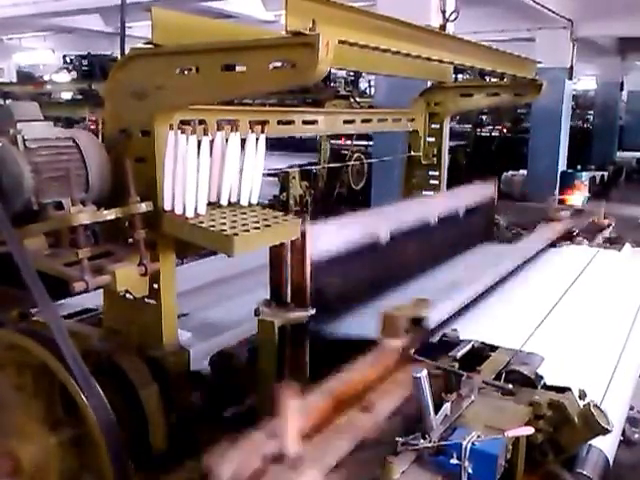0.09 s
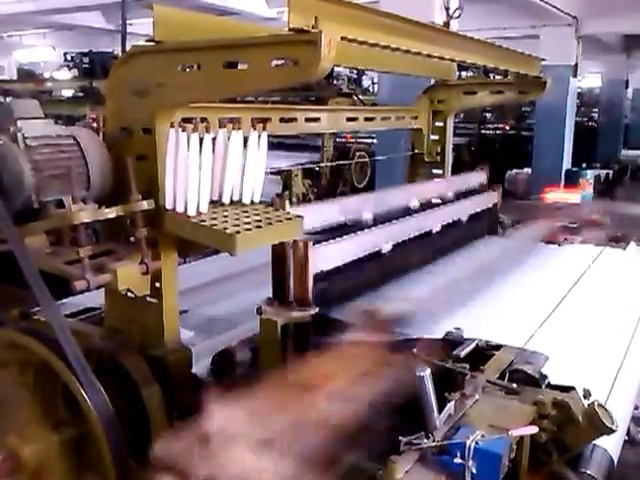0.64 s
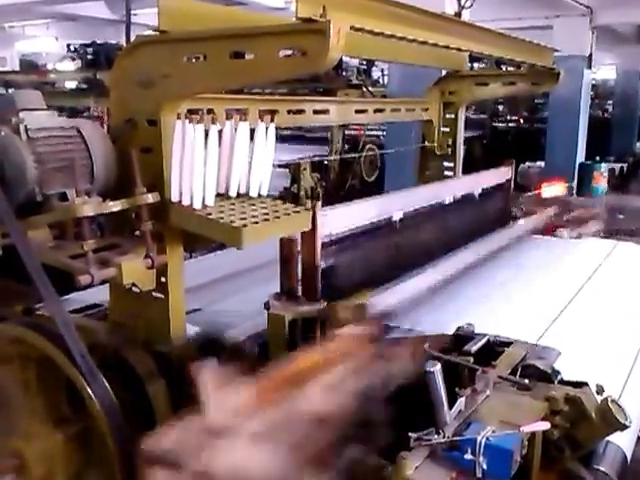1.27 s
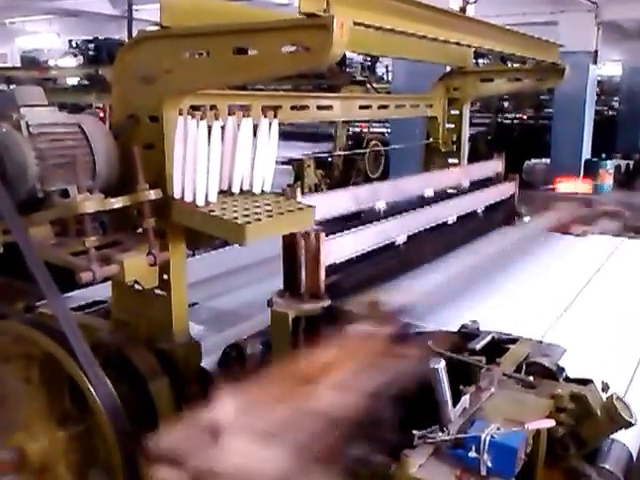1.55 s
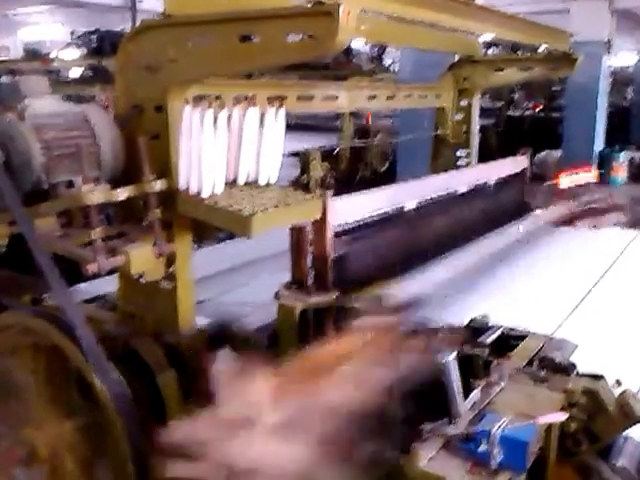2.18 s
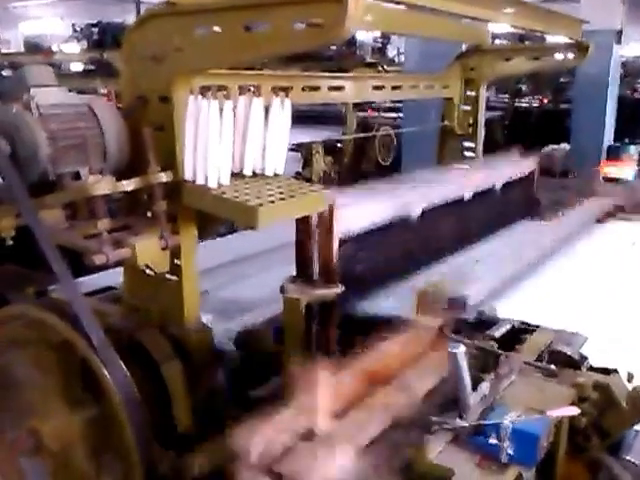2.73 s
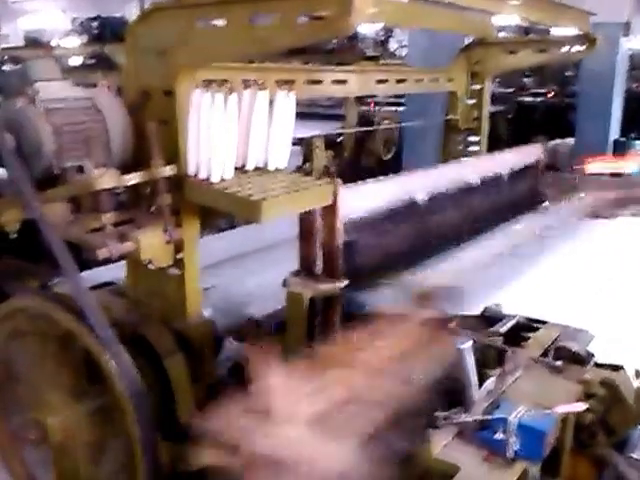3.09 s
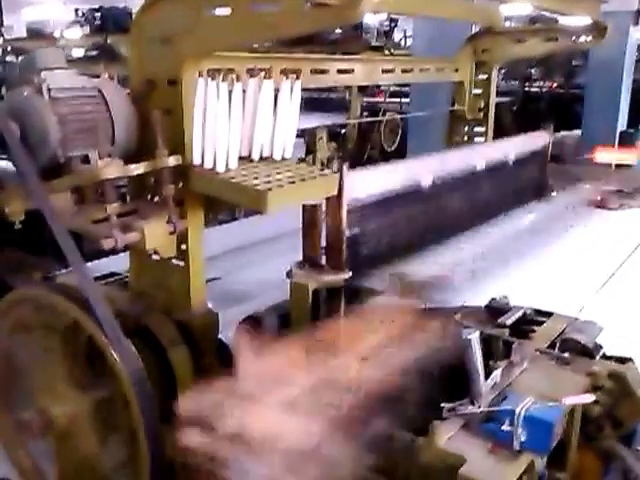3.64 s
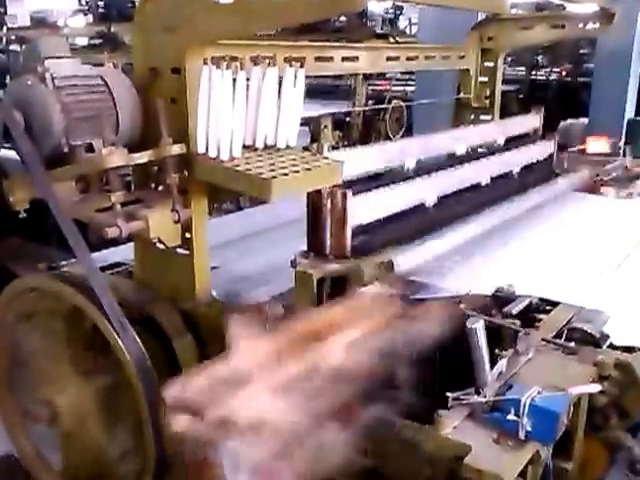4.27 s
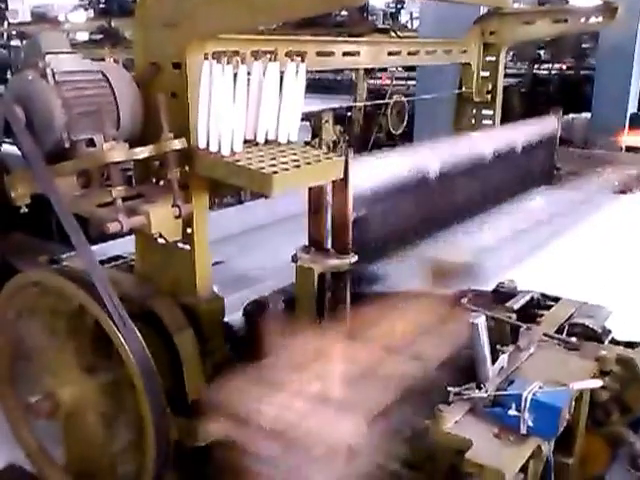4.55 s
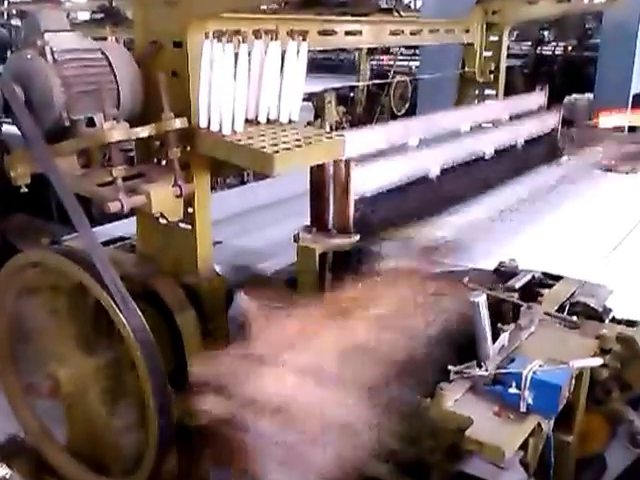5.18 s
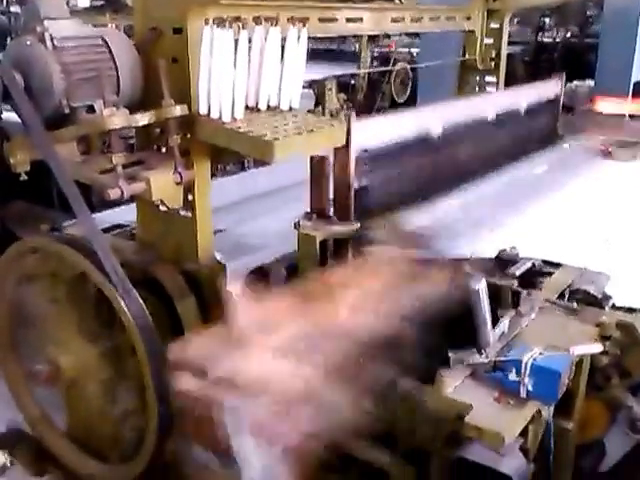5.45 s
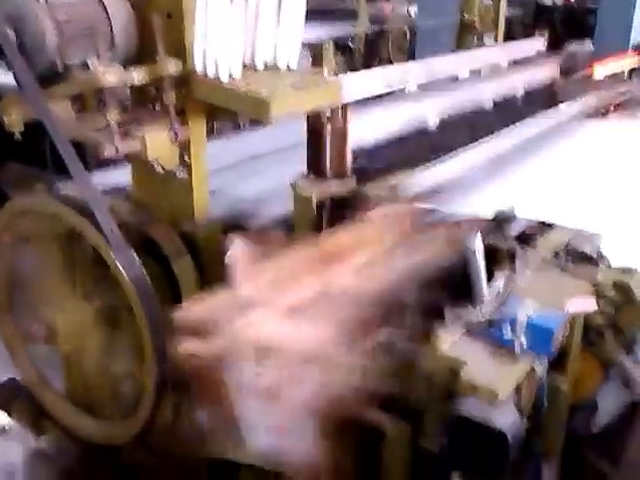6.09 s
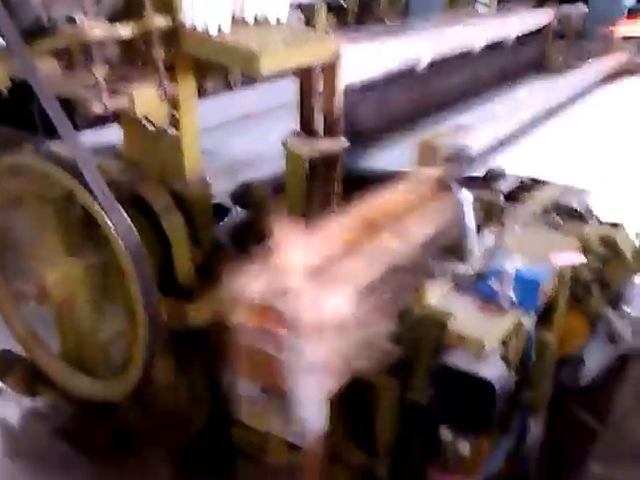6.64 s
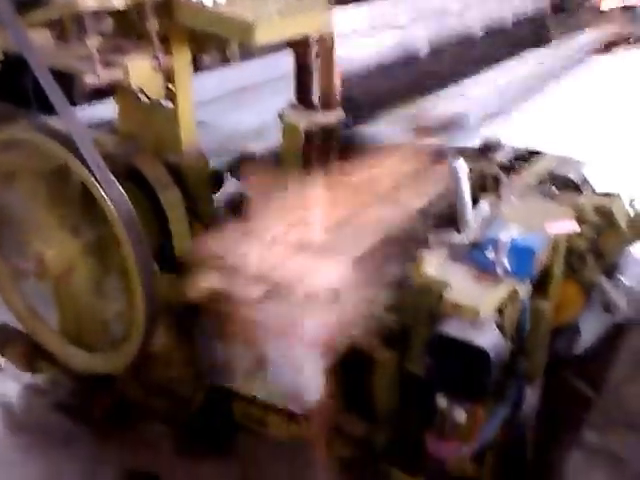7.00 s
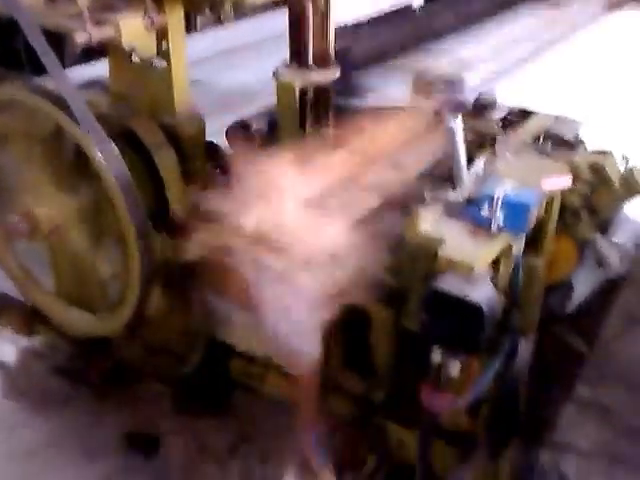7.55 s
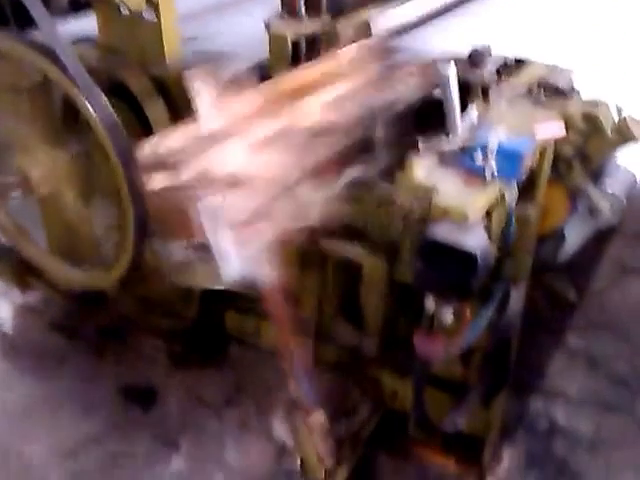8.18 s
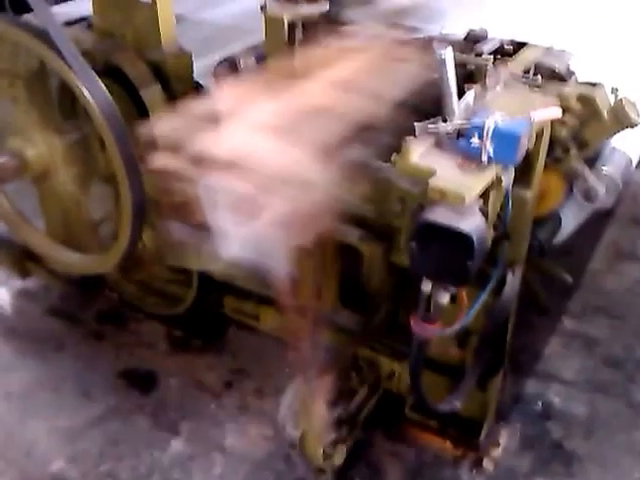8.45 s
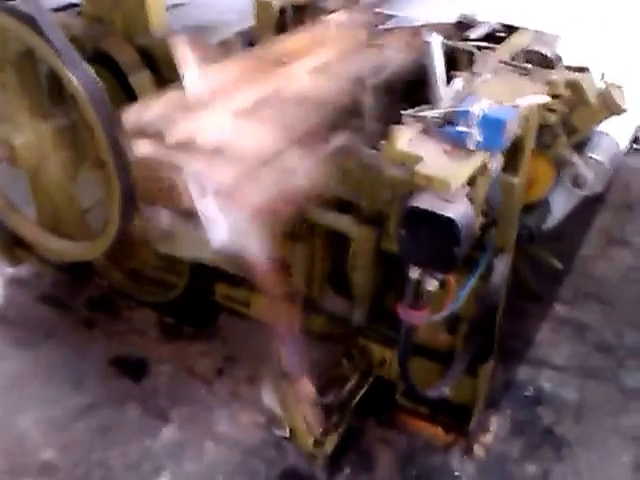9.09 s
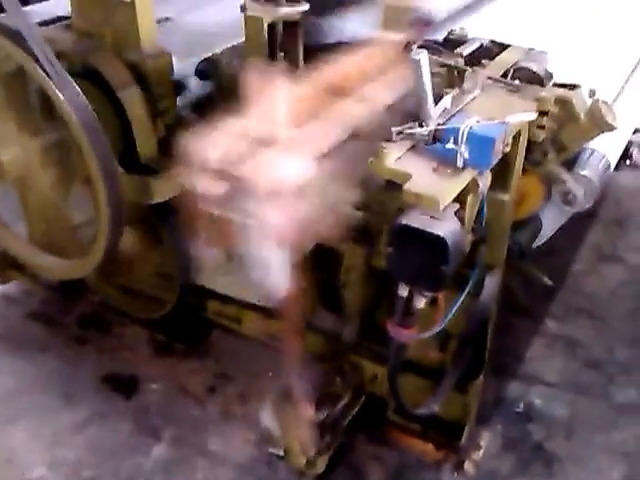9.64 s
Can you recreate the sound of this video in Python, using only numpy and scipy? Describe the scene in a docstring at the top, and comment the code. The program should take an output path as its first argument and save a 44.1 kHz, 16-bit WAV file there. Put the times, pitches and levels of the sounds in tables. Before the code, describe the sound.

Mechanical looms clack hard and fast close by, over constant metal rattling and the roar of a large weaving mill.

```python
"""Hard wooden clacks from three shuttle looms weaving close by in a large mill. Each loom turns in
about 0.87 s (a pick out and a pick back) at its own pace, so their beats drift past each other.
On every turn a shuttle slams into its box or a picking stick cracks against its buffer, and sley
and harness knock and rattle. A steel pawl ticks, iron frames ring, and rows of far looms merge
into a roar. The top end is narrow and the hardest blows clip."""
import sys
import numpy as np
from scipy import signal
from scipy.fft import rfft, irfft
from scipy.io import wavfile

SR = 44100
rng = np.random.default_rng(int(sys.argv[2]) if len(sys.argv) > 2 else 0)


def waveform_to_disk(signal):
    """Save audio, clipped to [-1, 1], as 16-bit WAV at the path in sys.argv[1]."""
    frames = np.transpose(np.atleast_2d(signal))
    scaled = np.clip(frames, -1, 1) * 32767
    samples = np.round(scaled).astype(np.int16)
    wavfile.write(sys.argv[1], SR, samples)


N = 433062
TIME = np.arange(N) / SR


def undb(db):
    """Decibels to gain."""
    return 10 ** (np.asarray(db) / 20)


def unit(x):
    """Scale to rms 1."""
    return x / np.sqrt(np.mean(x ** 2))


def add(out, x, start_s):
    """Mix x into out from start_s on."""
    i = max(int(start_s * SR), 0)
    out[i:i + len(x)] += x[:max(len(out) - i, 0)]


def resonance(x, hz, q):
    """Band-pass with gain 1 at hz."""
    return signal.lfilter(*signal.iirpeak(hz, q, fs=SR), x)


def low_pass(x, hz):
    """Steep low-pass without delay."""
    return signal.fftconvolve(x, signal.firwin(161, hz, fs=SR)[None], mode="same")


def colour(x, eq, bright_db=0, size=4096):
    """Unit-power EQ through (frequency [Hz], level [dB]) points; brightness tilts it about 2.6 kHz."""
    hz, db = np.transpose(eq)
    log_hz = np.log(np.maximum(np.arange(size // 2 + 1) * SR / size, 1))
    tilt_db = bright_db / 2 * np.tanh(2 * (log_hz - np.log(2600)))
    rolloff_db = 200 * np.maximum(log_hz - np.log(hz[-1]), 0)
    curve_db = np.interp(log_hz, np.log(hz), db) + tilt_db - rolloff_db
    # minimum phase: nothing rings ahead of an attack
    cepstrum = irfft(np.log(undb(np.maximum(curve_db, -70))))
    cepstrum[1:size // 2] *= 2
    cepstrum[size // 2 + 1:] = 0
    response = irfft(np.exp(rfft(cepstrum)))
    return signal.fftconvolve(x, response / np.linalg.norm(response))[:len(x)]


def contacts(samples, per_s, spread_db):
    """Random tiny impacts of unequal size, mean power 1."""
    hit = rng.random(samples) < per_s / SR
    size = undb(spread_db * np.clip(rng.standard_normal(samples), -2, 2))
    sign = rng.choice([-1, 1], samples)
    return unit(hit * size * sign + 1e-9)


def mill_reverb(x, wet_db, t60, damp_hz):
    """Add the diffuse echo of floor, pillars and machines, duller than the direct sound."""
    t = np.arange(SR) / SR
    tail = rng.standard_normal(SR) * np.exp(-np.log(1000) * t / t60) * (1 - np.exp(-t / 0.0022))
    tail = signal.sosfilt(signal.butter(1, damp_hz, fs=SR, output="sos"), tail)
    return x + undb(wet_db) * signal.fftconvolve(x, tail / np.linalg.norm(tail))[:N]


# pace of the fast, middle and slow loom: (loom, one turn [s])
LOOM_TURN_S = {"fast": .8555, "middle": .8745, "slow": .8906}
# EQ of the distant roar: (frequency [Hz], level [dB])
ROAR_EQ = [(20, -4.5), (45, -3), (75, 0.5), (150, 2), (260, -1.5), (420, 0.5), (700, 0), (1000, 1),
           (1400, -1), (1900, 2.5), (2500, -3), (3500, -1.5), (5000, -11.5), (7500, -10.5)]


def far_looms(level_db, beat_db, smear_s, count=14):
    """The bed: rows of looms, each at its own speed, their beats smeared into a roar by the hall."""
    power = np.ones(N)
    for pace, phase, weight in rng.random((count, 3)):
        pick_s = LOOM_TURN_S["middle"] / 2 * (.93 + .14 * pace)
        since = (TIME + phase * pick_s) % pick_s
        power += undb(beat_db) * weight * np.exp(-since / smear_s)
    roar = colour(np.sqrt(power) * rng.standard_normal(N), ROAR_EQ)
    return undb(level_db) * unit(roar)


# ring of the iron loom frames: (frequency [Hz], relative level [dB])
IRON_MODES = [(1190, -1.5), (1330, -3.5), (1460, 1), (1610, -5.5), (1830, -3), (1940, 2), (2200, 2),
              (2900, -6)]


def iron_frames(level_db, t60):
    """Stray taps set the frames ringing briefly, now in one mode, now in another."""
    rings = np.zeros(N)
    for hz, db in IRON_MODES:
        taps = contacts(N, per_s=9, spread_db=6.5)
        rings += undb(db) * resonance(taps, hz, q=hz * t60 * np.pi / np.log(1000))
    return undb(level_db) * unit(rings)


# strokes that shake the harness every turn: (loom, first peak [s], level [dB], rise [s], fall [s])
HARNESS_STROKES = [("fast", 0.35, -26.5, 0.02, 0.017), ("fast", 0.411, -24, 0.014, 0.05),
                   ("fast", 0.707, -26, .03, .025), ("middle", 0.037, -25.5, 0.05, .03),
                   ("middle", 0.1, -24, 0.023, 0.097), ("middle", .40, -26.5, 0.018, 0.027),
                   ("middle", 0.491, -26, 0.011, .025), ("middle", 0.704, -26.5, 0.076, 0.096),
                   ("slow", 0.038, -27.5, .035, 0.096), ("slow", 0.302, -25, .05, .035),
                   ("slow", 0.513, -27, 0.09, .03), ("slow", 0.74, -22.5, 0.022, 0.024)]
# EQ of the rattling linkages: (frequency [Hz], level [dB])
HARNESS_EQ = [(200, -19.5), (600, -11), (1000, -3.5), (1300, 2), (1800, 0.5), (2500, 0), (3300, -1),
              (4500, -4.5), (5100, -4), (6000, -6), (6700, -8), (8000, -9)]


def harness(steady_db):
    """Wire healds and linkages: a swarm of small contacts that swells with each stroke and falls back."""
    power = np.full(N, undb(steady_db) ** 2)
    for loom, peak_s, db, rise_s, fall_s in HARNESS_STROKES:
        since = (TIME - peak_s) % LOOM_TURN_S[loom]
        until = LOOM_TURN_S[loom] - since
        swell = np.maximum(np.exp(-since / fall_s), np.exp(-(until / rise_s) ** 2))
        power += undb(db) ** 2 * swell
    swarm = contacts(N, per_s=7000, spread_db=3.5)
    return colour(swarm * np.sqrt(power), HARNESS_EQ)


def blows(hits, eq, gain_db, spot_db, crack_s, rebound_s, rebound, rattle_s, modes=(), ring_db=0):
    """Each blow cracks, rebounds once, rings the struck part and leaves a short rattle."""
    snap, snap_s = 0.35, .0006  # extra force in the first hard instant of contact
    out, t = np.zeros(N), np.arange(SR // 4) / SR
    attack = t < .009
    for time_s, db, bright_db, rattle_db, spot_hz in hits:
        since_rebound = t - rebound_s * rng.uniform(.7, 1.3)
        bounce = rebound * (since_rebound > 0) * np.exp(-np.abs(since_rebound) / crack_s)
        force = snap * np.exp(-t / snap_s) + np.exp(-t / crack_s) + bounce
        body = colour(force * rng.standard_normal(len(t)), eq, bright_db)
        body /= np.std(body[attack])
        # where the blow lands decides which resonance speaks most
        spot = resonance(body, spot_hz, q=12)
        body += undb(spot_db) * spot / np.std(spot[attack])
        for hz, mode_db, t60 in modes:
            detune, share, sign = rng.normal(1, 0.024), rng.uniform(0.74, 1.3), rng.choice([-1, 1])
            ring = np.sin(2 * np.pi * hz * detune * t) * np.exp(-np.log(1000) * t / t60)
            body += sign * share * undb(ring_db + mode_db - bright_db / 2) * ring
        rattle = colour(contacts(len(t), per_s=5000, spread_db=1.5), eq, bright_db / 2)
        rattle *= np.exp(-t / rattle_s) * (1 - np.exp(-t / 0.0055))
        blow = body / np.std(body[attack]) + undb(rattle_db) * rattle
        add(out, undb(db + gain_db) * blow, time_s - snap_s / 2)
    return out


# catches of the pawl: (time [s], relative level [dB])
PAWL_CATCHES = [(1.615, -21), (2.503, -15.5), (3.396, -18), (4.285, -16), (6.068, -14.5), (6.48, -19.5),
                (6.959, -15.5), (7.448, -17), (7.848, -13), (8.697, -15.5), (8.741, -18), (9.633, -19)]
# EQ of a tick on steel: (frequency [Hz], level [dB])
STEEL_EQ = [(300, -30), (1500, -7), (3300, -11), (4300, 5), (6200, 2.5), (8000, -17)]


def pawl(ring_hz, chatter_db):
    """A steel pawl catches with a thin tick, often at the same point in the slow loom's turn."""
    hits = [(time_s, db, 0, chatter_db, ring_hz) for time_s, db in PAWL_CATCHES]
    return blows(hits, STEEL_EQ, gain_db=-5.5, spot_db=-7,
                 crack_s=0.003, rebound_s=0.0042, rebound=0.3, rattle_s=0.014)


# lighter knocks that come back every turn: (loom, first time [s], relative level [dB],
# growth [dB/s], brightness [dB], rattle [dB], struck-spot resonance [Hz])
TURN_KNOCKS = [("fast", .247, -14, -.05, 3.6, 3.3, 6300), ("middle", .793, -14, -.2, -1.5, 2.3, 1500),
               ("slow", .0155, -17.5, .1, 0, 3.7, 3300), ("slow", .679, -19.5, .1, 0.84, 1, 4800)]
# occasional louder loom knocks, most landing on a loom's regular beat:
# (time [s], relative level [dB], brightness [dB], rattle [dB], struck-spot resonance [Hz])
ACCENTED_KNOCKS = [(1.185, -14.5, -9, -1, 1460), (1.666, -17.5, 4, 5, 1550), (4.469, -16.5, 3, 2, 3420),
                   (5.521, -17.5, 7, -2, 2150), (6.24, -17.5, -4, 5, 2210), (7.791, -16, -4, 1.5, 1570),
                   (8.92, -19.5, -1, 2, 1500)]
# EQ of the knocks: (frequency [Hz], level [dB])
KNOCK_EQ = [(200, -14.5), (600, -11), (1200, -2), (2000, 1.5), (2500, -2.5), (3200, 0.5), (4500, -4),
            (6500, -6), (8000, -9.5)]


def knocks(scatter_db):
    """Sley and harness knock in time with their loom, slowly growing or fading, with a few accents."""
    hits = []
    for loom, first_s, db, growth_db_per_s, *tone in TURN_KNOCKS:
        for time_s in np.arange(first_s, N / SR, LOOM_TURN_S[loom]):
            hit_db = db + growth_db_per_s * time_s + scatter_db * rng.standard_normal()
            hits.append((time_s, hit_db, *tone))
    return blows(hits + ACCENTED_KNOCKS, KNOCK_EQ, gain_db=-4.5, spot_db=-8.5,
                 crack_s=0.0067, rebound_s=.011, rebound=0.42, rattle_s=0.03)


# hits of the stick on its buffer:
# (time [s], relative level [dB], brightness [dB], rattle [dB], struck-spot resonance [Hz])
STICK_HITS = [(0.0167, -6, 4, -5, 4130), (0.8695, -7.5, 8, -1.5, 3820), (1.7254, -8, 1.5, -5, 2090),
              (2.5832, -8, 0.5, -6, 2120), (3.4388, -6.5, -1.5, -3.5, 4700), (4.2941, -7.5, -1, -5.5, 1650),
              (5.1523, -12, 1, 0.5, 1730), (6.0047, -9.5, -3.5, -1, 2150), (6.862, -10.5, 1, 0.5, 2200),
              (7.7151, -9.5, -2, 0, 3700), (8.5719, -10, 1, 0.5, 4980), (9.4279, -11.5, 0, -1.5, 1660)]
# EQ of the stick's crack: (frequency [Hz], level [dB])
STICK_EQ = [(200, -24), (600, -15), (1050, -14.5), (1500, 0), (2100, 0), (2500, -3.5), (3600, -1.5),
            (4600, -4.5), (6500, -5), (8000, -16)]
# modes of the stick: (frequency [Hz], relative level [dB], t60 [s])
STICK_RING = [(1510, -16, 0.055), (1810, -2, 0.086), (2153, 6, 0.049), (3240, -11, 0.042),
              (3640, -7.5, 0.027)]


def picking_stick():
    """The fast loom's picking stick cracks against its buffer once a turn and rings briefly."""
    return blows(STICK_HITS, STICK_EQ, gain_db=-2, spot_db=-8.5, modes=STICK_RING, ring_db=-7,
                 crack_s=0.0037, rebound_s=0.0068, rebound=0.18, rattle_s=0.028)


# shuttle slams of the middle and the slow loom:
# (time [s], relative level [dB], brightness [dB], rattle [dB], struck-spot resonance [Hz])
MIDDLE_SLAMS = [(0.555, -5, 0, -6, 1730), (1.429, -8, 5, -1.5, 1620), (2.3049, -8.5, 1, -2, 1600),
                (3.1838, -9.5, 4, -0.5, 1590), (4.0548, -8, 1, 1.5, 1660), (4.931, -8.5, 2, -2, 1610),
                (5.805, -9.5, 2, 2.5, 1690), (6.681, -7.5, -2, -2, 3440), (7.5525, -8, -1, -4, 1510),
                (8.4266, -9, -3.5, 1.5, 5370), (9.3029, -7, -3, -5.5, 1670)]
SLOW_SLAMS = [(0.4292, -10.5, 8, -4, 4660), (1.3205, -10, 4, -7, 1750), (2.2134, -12, -2, -4, 6520),
              (3.1012, -9, 7, -3.5, 1650), (3.9897, -10.5, 1, -5, 5530), (4.8819, -8.5, 2, -2, 1740),
              (5.7735, -9.5, -2, -5, 5020), (6.6641, -9.5, 5, -3, 1670), (7.555, -8, 4, -6, 1700),
              (8.4438, -8, 0, -4, 1770), (9.337, -10, 0, 0.5, 1730)]
# EQ of each shuttle's crack: (frequency [Hz], level [dB])
MIDDLE_EQ = [(200, -35), (600, -13), (1050, -7), (1500, -1.5), (2100, 1.5), (2500, -1), (3600, -0.5),
             (4600, -4), (6500, -6.5), (8000, -15.5)]
SLOW_EQ = [(200, -24), (900, -9), (1700, 3.5), (2400, -1), (3700, -5), (4500, -0.5), (6800, -5),
           (8000, -1.5)]
# modes of the wooden shuttle box: (frequency [Hz], relative level [dB], t60 [s])
BOX_RING = [(1485, 1.5, 0.043), (1586, 0, 0.069), (1744, 1, 0.085), (1960, -7, 0.024), (3000, -2, 0.033),
            (3430, -15.5, 0.031), (3900, -1, 0.019)]


def shuttles():
    """Two shuttles slam into their boxes once a turn; the slow loom's rings less and bounces harder."""
    middle = blows(MIDDLE_SLAMS, MIDDLE_EQ, gain_db=-2.5, spot_db=-3, modes=BOX_RING, ring_db=-4,
                   crack_s=0.0045, rebound_s=0.004, rebound=0.24, rattle_s=0.028)
    slow = blows(SLOW_SLAMS, SLOW_EQ, gain_db=-3.5, spot_db=-10, modes=BOX_RING, ring_db=-12.5,
                 crack_s=0.0044, rebound_s=0.0038, rebound=0.54, rattle_s=0.028)
    return middle + slow


def scene():
    """Close blows echo in the hall, over a bed of rattle, ringing iron and roar."""
    close = shuttles() + picking_stick() + knocks(scatter_db=0.85) + pawl(ring_hz=4900, chatter_db=-1.5)
    foreground = mill_reverb(close, wet_db=-14.5, t60=0.43, damp_hz=3500)
    bed = harness(steady_db=-29.5) + iron_frames(level_db=-36, t60=.2)
    bed += far_looms(level_db=-27, beat_db=-1, smear_s=.04)
    return (foreground + bed)[None]


def record(dry):
    """Lo-fi finish: narrow band, rounded peaks, treble mirrored up by a low sampling rate, clipping."""
    band_hz, sampling_hz = 7150, 16000
    soft_ceiling, hard_ceiling = 1.05, .92
    band = signal.sosfilt(signal.butter(14, band_hz, fs=SR, output="sos"), dry)
    rounded = band / (1 + np.abs(band / soft_ceiling) ** 6) ** (1 / 6)
    rounded = low_pass(rounded, hz=7450)
    mirror = 2 * rounded * np.cos(2 * np.pi * sampling_hz * TIME)
    mirror = signal.sosfilt(signal.butter(10, 8700, fs=SR, output="sos"), mirror)
    mirror = low_pass(mirror, hz=10100)
    clipped = np.clip(rounded + undb(-11.5) * mirror, -hard_ceiling, hard_ceiling)
    return low_pass(clipped, hz=16000)


dry = scene()
out = record(dry)
waveform_to_disk(out)
```